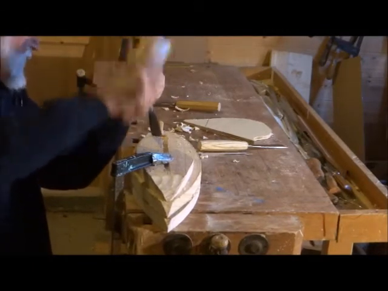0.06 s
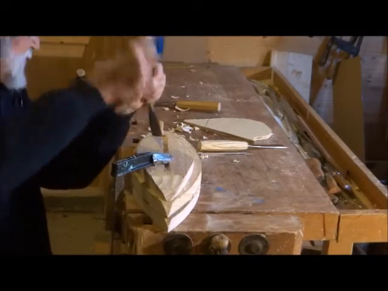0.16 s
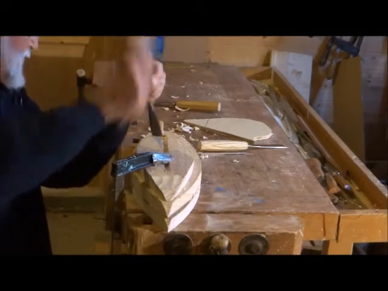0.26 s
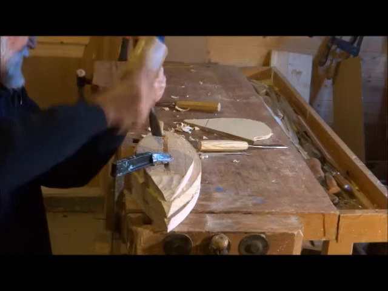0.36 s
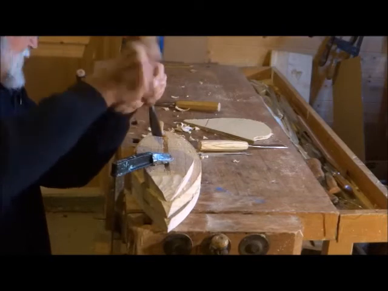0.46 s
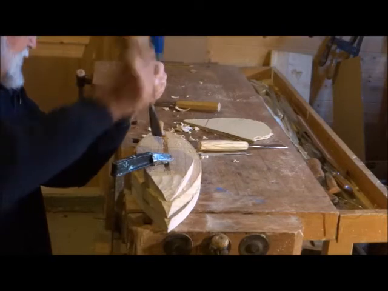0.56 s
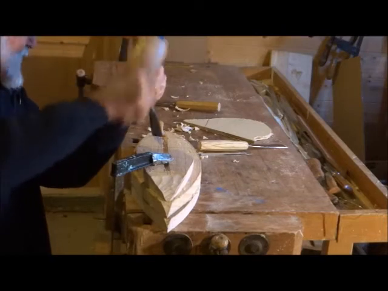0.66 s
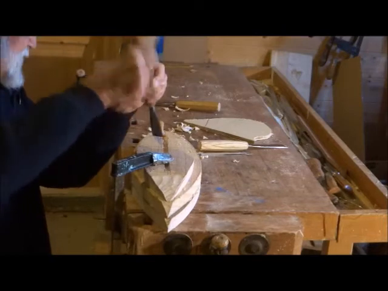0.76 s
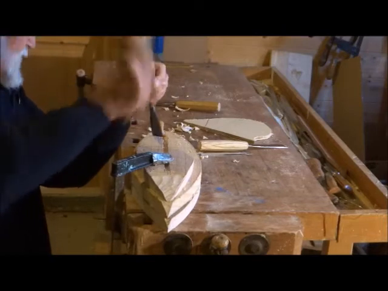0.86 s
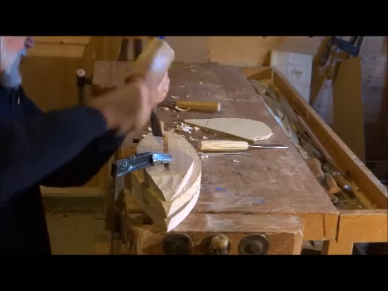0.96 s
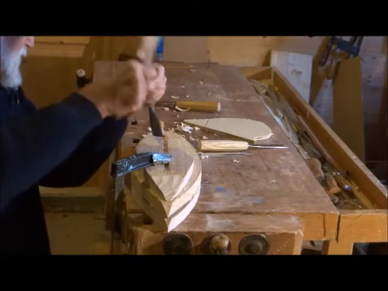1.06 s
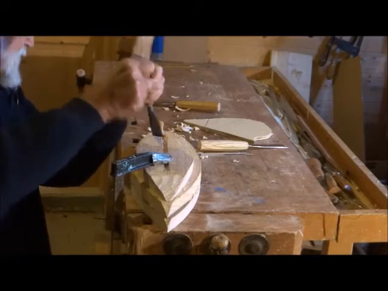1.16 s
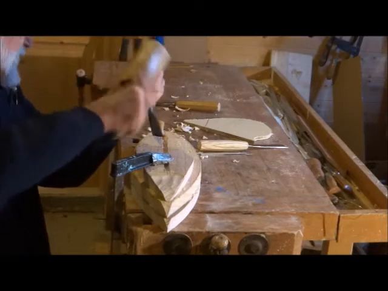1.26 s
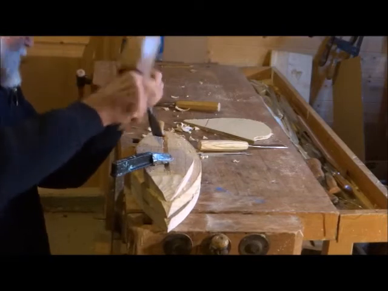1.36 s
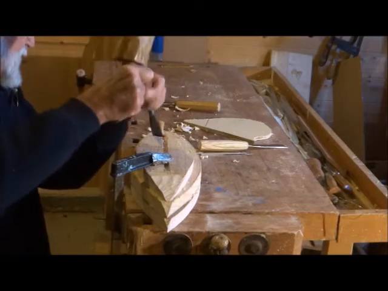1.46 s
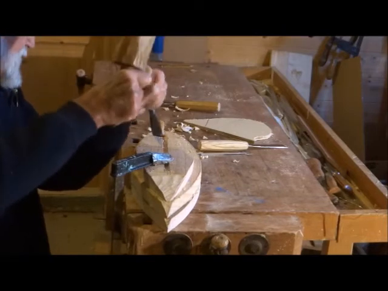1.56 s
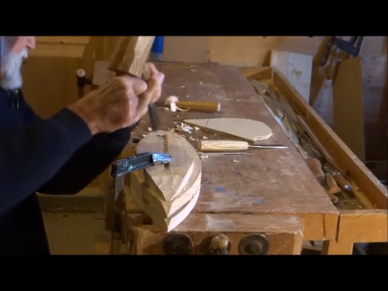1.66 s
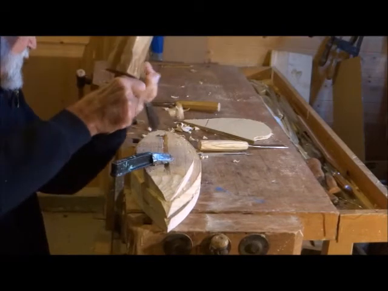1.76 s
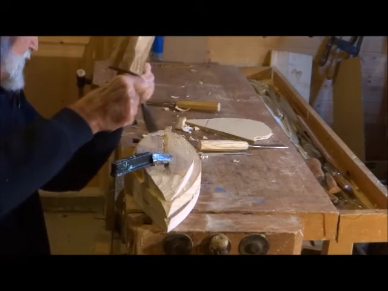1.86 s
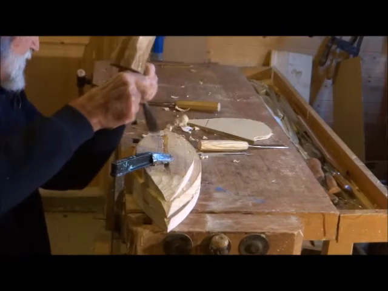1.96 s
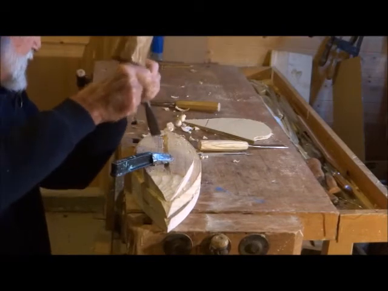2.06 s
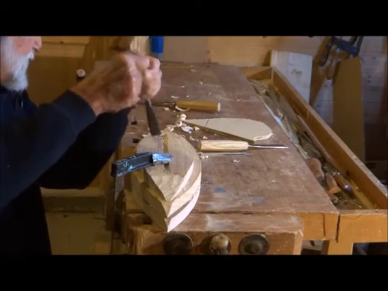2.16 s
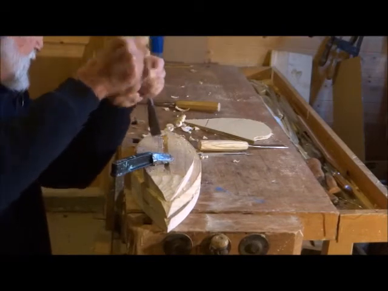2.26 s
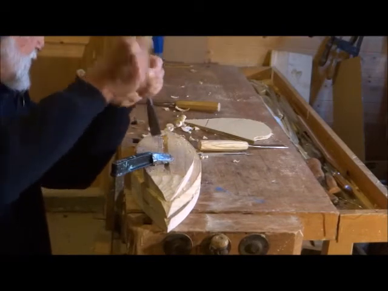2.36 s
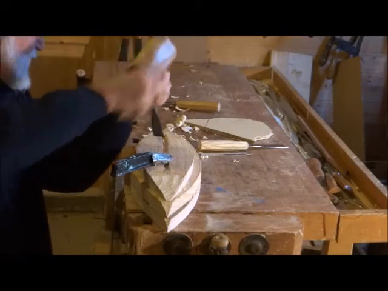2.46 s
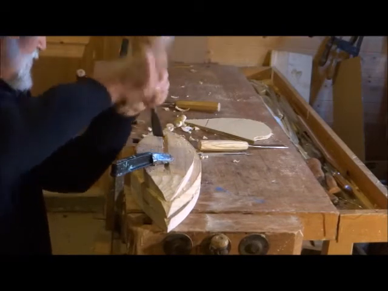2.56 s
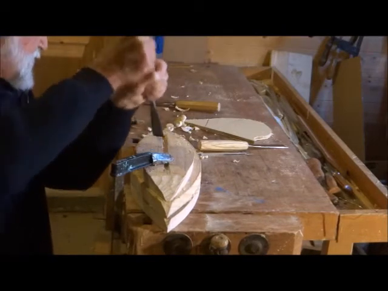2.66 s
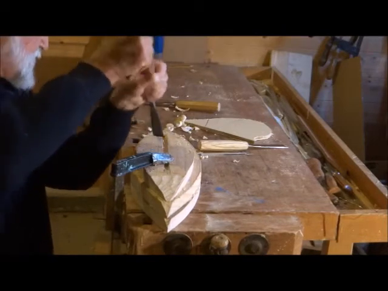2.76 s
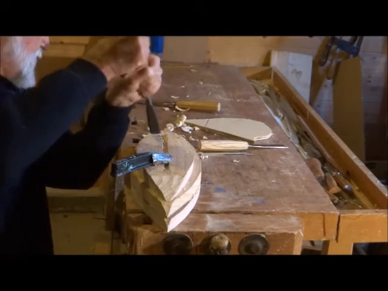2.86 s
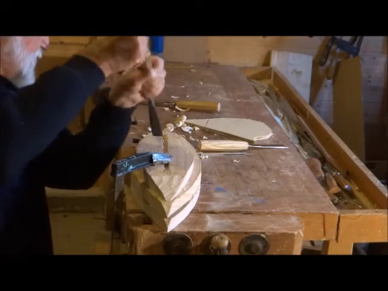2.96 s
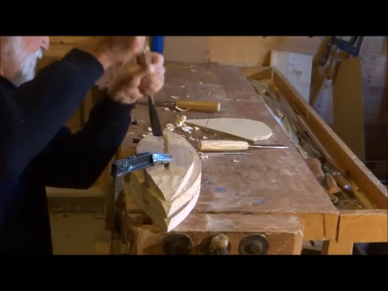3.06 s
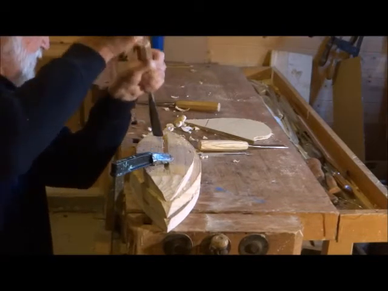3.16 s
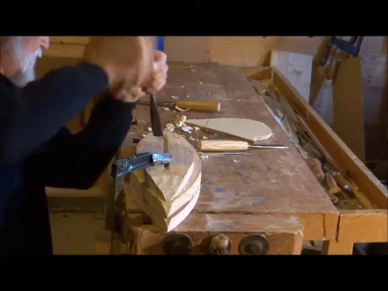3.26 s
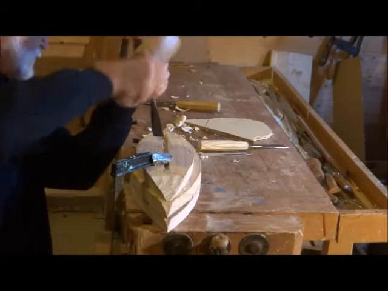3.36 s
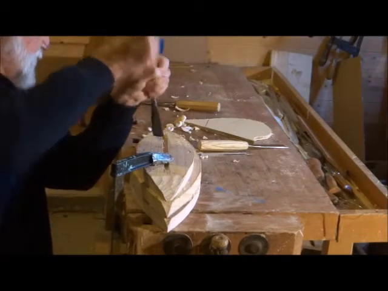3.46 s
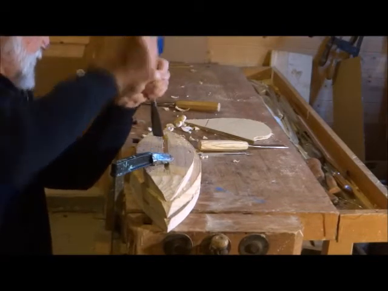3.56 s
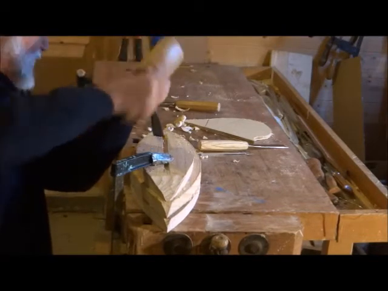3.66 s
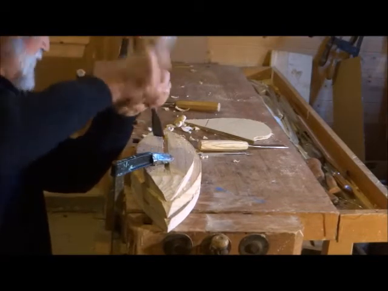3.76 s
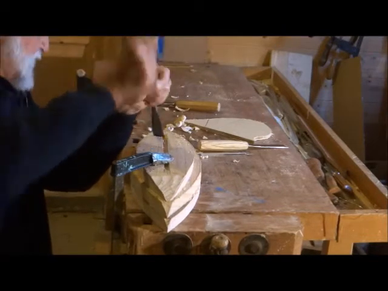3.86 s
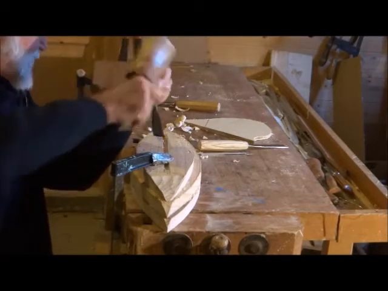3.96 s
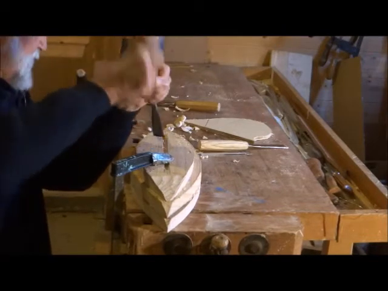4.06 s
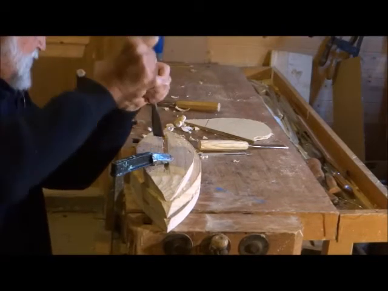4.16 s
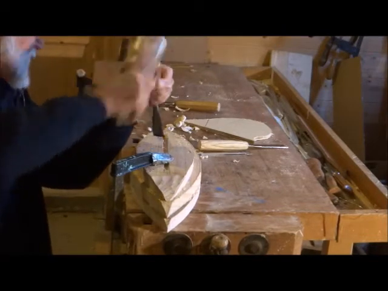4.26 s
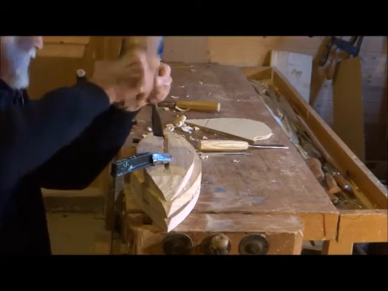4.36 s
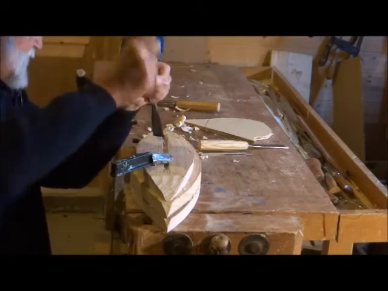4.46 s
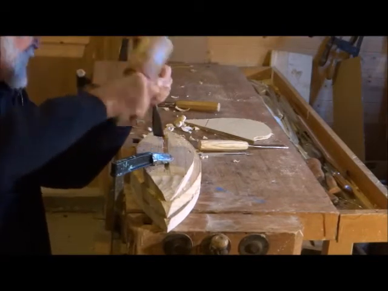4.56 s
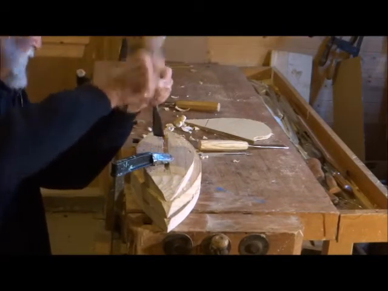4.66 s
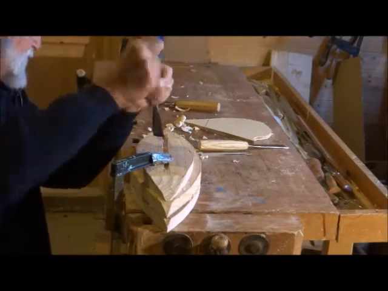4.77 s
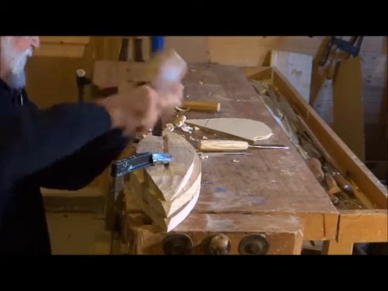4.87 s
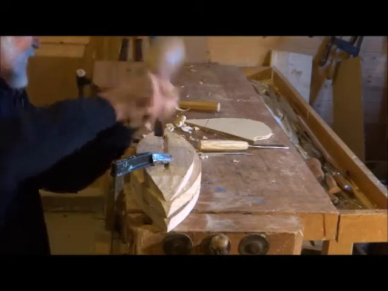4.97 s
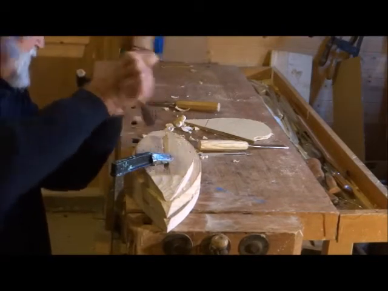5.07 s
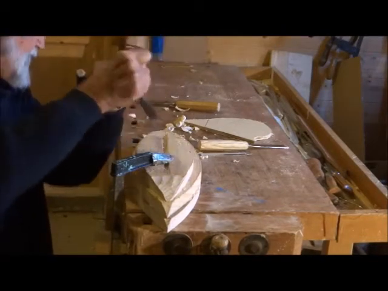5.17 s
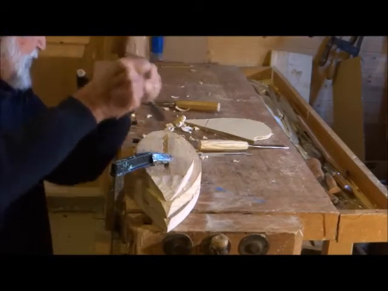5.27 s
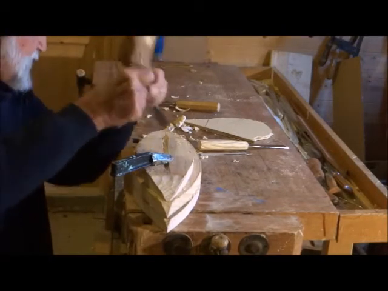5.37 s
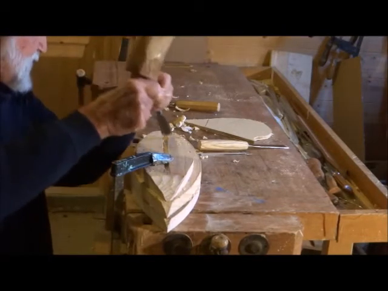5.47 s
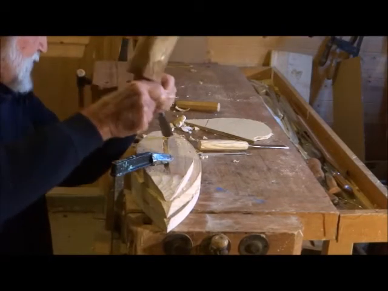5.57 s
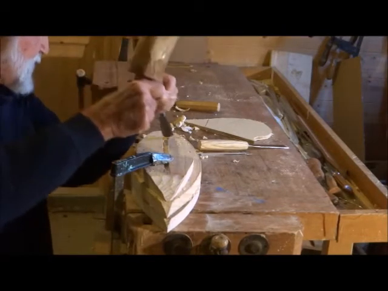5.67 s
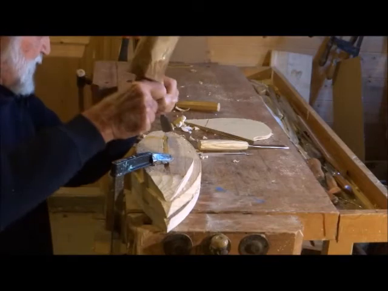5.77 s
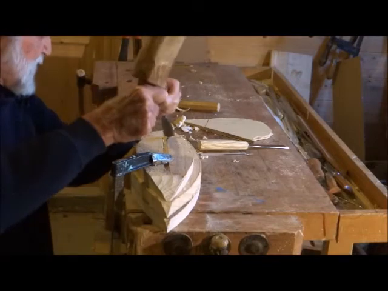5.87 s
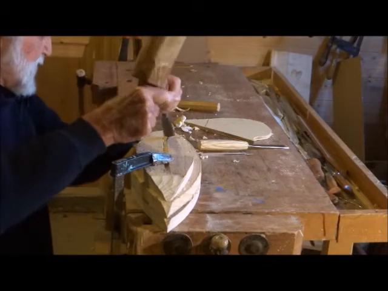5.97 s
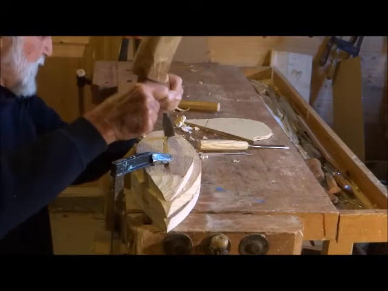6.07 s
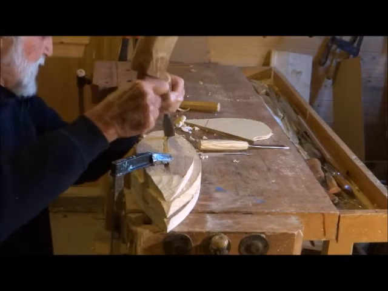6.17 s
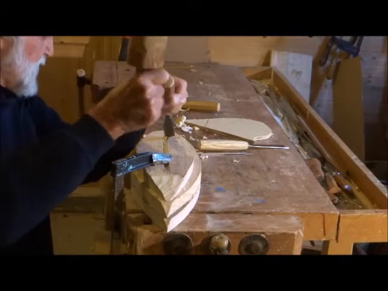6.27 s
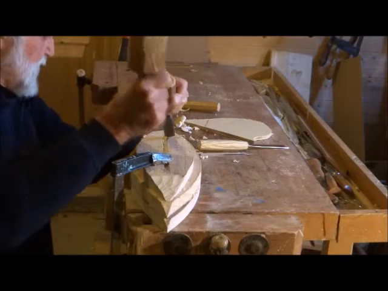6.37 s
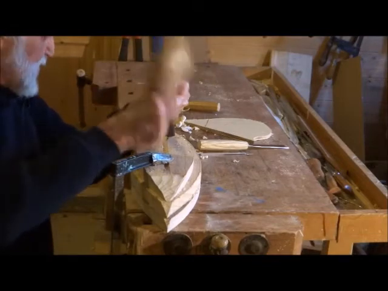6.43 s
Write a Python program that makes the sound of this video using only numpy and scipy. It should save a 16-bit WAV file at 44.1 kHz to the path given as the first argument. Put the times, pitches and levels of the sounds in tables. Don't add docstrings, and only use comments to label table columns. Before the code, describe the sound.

A wooden mallet strikes a chisel in a block clamped to a heavy bench, heard close in a small, short-echoing workshop. Hard knocks land at the very start and at about 0.3, 0.6, 0.9 and 1.2 seconds, each with a sharp woody crack, hollow bench ring and brief steel ring, squashed at its peak. From 1.5 to 2.0 chips snap in dry bright ticks and a duller bump. A softer tap comes at 2.4, then tiny clicks and tearing fibres, with a distinct short scrape near 3.0. A second run follows at 3.3, 3.6, 3.9, 4.2, 4.5 and 4.8, varying slightly in tone, the last strong. Small tearing, scraping ticks follow around 5.0 to 5.1. Quiet shop air then remains, with a dull bench bump at 5.8, faint scrapes near 6.3 and one light tap at 6.45.

```python
import sys
import numpy as np
from scipy import signal
from scipy.fft import rfft, irfft
from scipy.io import wavfile
from scipy.ndimage import uniform_filter1d, minimum_filter1d

SR = 44100
rng = np.random.default_rng(int(sys.argv[2]) if len(sys.argv) > 2 else 0)


def invert_db(level):
    return 10 ** (np.asarray(level, dtype=float) / 20)


def int16_out(signal):
    q = np.round(np.clip(np.atleast_2d(signal).T, -1, 1) * 32767)
    wavfile.write(sys.argv[1], SR, q.astype(np.int16))


N = 286650
LEAD = 2048
FORERUN = 132
HZ = np.fft.rfftfreq(32768, 1 / SR)

# f/Hz, width/Hz, level/dB
BENCH = [(294.4, 8.1, 4), (295.6, 81, -2), (397.2, 6.2, -8), (435.8, 37, 4.5), (493.3, 15, 3.5),
         (604, 170, -2.5), (711, 19, -2.5)]
# f/Hz, width/Hz, level/dB
FLOORBOARDS = [(83, 4.5, -16.5), (116, 7.4, -15.5)]


def blow(force_db, off, bite, edge_hz):
    # f/Hz, level/dB
    push = [(60, -53), (170, -30), (280, -11), (900, 1.04), (2500, -4), (5000, -21.5), (8500, -18.5),
            (11000, -35.5)]
    # f/Hz, width/Hz, level/dB
    mallet = [(1500, 52, -3), (1562.5, 37, -3.5), (1530, 310, -3)]
    handle = [(1151, 83, 6), (1230, 75, -11), (1330, 210, -3)]
    steel = [(1940, 78, 7.5), (2694, 420, 4), (3536, 41, 2.5), (4360, 620, -1.5), (5330, 240, -4),
             (5650, 66, -5.5), (7700, 1100, -16.5)]
    headroom_db = 65
    spread_db = 1.5

    thud_db = -31 + force_db
    body_db = -34.5 + force_db + 11 * bite
    handle_db = -31.5 + 0.89 * force_db - 6.5 * bite
    handle_db += 10 * off
    ring_db = -21 + 0.12 * force_db + 20 * np.log10(np.clip(1 - off, 0.01, 1))
    crack_db = -28 + 0.67 * force_db - 1.5 * bite

    luck = rng.standard_normal(16)
    between_db = 0.5 * (handle_db + crack_db)
    tilt = [(420, thud_db), (750, body_db), (1200, handle_db), (2200, between_db), (4000, crack_db)]
    power = invert_db(read(push, HZ) + read(tilt, HZ)) ** 2
    power += rings(BENCH, thud_db + 5.5, luck, spread_db, 0.0099)
    power += rings(handle, handle_db, luck[9:], spread_db, 0.011)
    power += rings(mallet, ring_db + 1, luck[6:], spread_db, 0.0054)
    power += rings(steel, crack_db - 11, luck[3:], spread_db, 0.0091)
    power += rings(FLOORBOARDS, thud_db - 8.5, luck[2:], spread_db, 0.01)
    edge_db = 6.5 / (1 + (2 * (HZ / edge_hz - 1) / 0.11) ** 2)

    knock = splintered(causal(10 * np.log10(power) + edge_db), 0.004)
    sound = np.r_[np.zeros(FORERUN), knock]
    sound[:len(knock)] += invert_db(-46) * signal.lfilter(*signal.butter(2, 0.1), knock)
    return invert_db(headroom_db) * sound


def rings(modes, db, luck, spread_db, detune):
    hz, width_hz, peak_db = np.transpose(modes)[:, :, None]
    strength = luck[:len(modes), None]
    shift = luck[::-1][:len(modes), None]
    off = 2 * (HZ - hz * (1 + detune * shift)) / width_hz
    skirt = np.minimum(HZ / hz, hz / (HZ + 1)) ** 6
    return (invert_db(db + peak_db + spread_db * strength) ** 2 / (1 + off ** 2) * skirt).sum(0)


def causal(db):
    log_gain = np.log(invert_db(np.maximum(np.r_[db, db[-2:0:-1]], -100)))
    return np.fft.ifft(np.exp(np.conj(signal.hilbert(log_gain)))).real


def splintered(x, lag_s):
    steps_hz = np.arange(0, SR / 2, 700)
    uneven = np.interp(HZ, steps_hz, 0.33 + 0.7 * rng.random(len(steps_hz)))
    treble = np.clip(HZ / 3000 - 0.6, 0, 1)
    lag = lag_s * uniform_filter1d(uneven, size=400) * treble
    late = irfft(rfft(x) * np.exp(-2j * np.pi * np.cumsum(lag) * HZ[1]))
    return late[:24000] * np.hanning(48000)[24000:]


def tear(length_s, *colour):
    u = np.arange(4096) / SR / max(length_s, 0.004)
    size = invert_db(2.5 * rng.exponential(1, 4096)) * rng.standard_normal(4096)
    return invert_db(36.5) * tint(size * u ** 0.91 * (u < 1), *colour)


def snap(*colour):
    return invert_db(33) * tint(np.exp(-np.arange(64) / 0.13), *colour)


def tint(x, level_db, heft, ring_hz):
    anchors_hz = [110, 300, 1100, 1500, 3000, 5000, 9000, 11000]
    middle_db = [-12.5, -0.5, 7, 2.5, 0.9, -1.5, 0, -16]
    swing_db = [45.5, 36, 16.5, -6.5, -11, -26, -24.5, -26]
    heavier = heft - 0.5
    colour_db = level_db + np.array(middle_db) + heavier * np.array(swing_db)
    ring_db = 9 / (1 + ((HZ - ring_hz) / (14 + 0.057 * ring_hz)) ** 2)
    bench = rings(BENCH + FLOORBOARDS, level_db + heavier * 42.5, np.zeros(16), 0, 0)
    power = invert_db(read(np.c_[anchors_hz, colour_db], HZ) + ring_db) ** 2 + bench
    pulse = causal(10 * np.log10(power))[:8192] * np.hanning(16384)[8192:]
    return signal.fftconvolve(unit(x), pulse)


def workshop(x):
    # f/Hz, t60/s
    decay = [(100, 0.39), (260, 0.26), (700, 0.28), (1800, 0.25), (5000, 0.25), (10000, 0.23)]
    # t/s, level/dB
    echoes = [(.0058, -13), (.0085, 6), (.0103, 2), (.016, -9.5), (.021, -13), (.026, -3)]
    loft_db, loft_slower = -23, 1.76

    hz, z = pair(420, size=256)
    t = np.arange(z.shape[2]) * 64 / SR
    fade_db = -60 * t / read(decay, hz)[:, None]
    z = z * np.hypot(invert_db(fade_db), invert_db(loft_db + fade_db / loft_slower))
    tail = signal.istft(z, nperseg=256, noverlap=192)[1]
    build_up = np.clip((np.arange(tail.shape[1]) / SR - 0.001) / 0.012, 0, 1)
    tail = invert_db(21.5) * tail / np.linalg.norm(tail[0]) * build_up
    tail[:, 0] += 1
    for k, (s, db) in enumerate(echoes):
        skew = np.array([1, -1]) * (k % 3 - 1)
        tail[[0, 1], round(s * SR) + skew] += (-1) ** k * invert_db(db)
    return signal.fftconvolve(x[None], tail / np.linalg.norm(tail[0]), axes=1)[:, LEAD:LEAD + N]


def hum():
    # t/s, level/dB
    course = [(0, -69), (2.899, -61.5), (5.299, -65), (5.799, -65.5), (6.0, -62), (6.5, -64)]
    # f/Hz, level/dB per Hz
    colour = [(18, -80), (30, -53.5), (170, -20), (400, -17.5), (800, -14.5), (2200, -17), (6000, -24),
              (11000, -25)]
    # f/Hz, width/Hz, level/dB
    resonances = [(163, 14, 10.5), (297.3, 21, 15), (496, 160, 10.5), (1000, 150, 6.5), (1770, 300, 2.5)]
    hz, z = pair(N // 256 + 5, size=1024)
    noise = rng.standard_normal(z.shape[:0:-1]).T
    patches_db = 1.2 * evened(uniform_filter1d(uniform_filter1d(noise, 8, 0), 20, 1))
    colour_db = read(colour, hz)
    for f, width_hz, db in resonances:
        colour_db = colour_db + db / (1 + (2 * (hz - f) / width_hz) ** 2)
    z = z * invert_db(colour_db[:, None] + patches_db)
    air = signal.istft(z, nperseg=1024, noverlap=768)[1][:, :N]
    return evened(air) * invert_db(np.interp(np.arange(N) / SR, *np.transpose(course)))


def pair(frames, size):
    # f/Hz, likeness/0-1
    likeness = [(60, .94), (200, .99), (500, .97), (1000, .92), (2000, .87), (4000, .84), (8000, .79)]
    hz = np.fft.rfftfreq(size, 1 / SR)
    a, b, c, d = rng.standard_normal((frames, len(hz), 4)).T
    same = np.clip(read(likeness, hz), 0, 1)[:, None]
    mid = np.sqrt((1 + same) / 2) * (a + 1j * b)
    side = np.sqrt((1 - same) / 2) * (c + 1j * d)
    return hz, np.array([mid + side, mid - side])


def read(points, hz):
    f, value = np.transpose(points)
    return np.interp(np.log(hz + 1), np.log(f + 1), value)


def evened(x):
    return x / np.sqrt(np.mean(x ** 2) + 1e-20)


def unit(x):
    return x / np.linalg.norm(x)


def add(mix, s, sound):
    part = mix[round(s * SR) + LEAD:][:len(sound)]
    part += sound[:len(part)]


def scene():
    # t/s, force/dB, off face centre/0-1, bite into solid wood/0-1, buried edge f/Hz
    blows = [(-0.012, 1, 0.4, 0.3, 7600), (0.2945, 0, 0.5, 0.2, 7730), (0.5966, -1, 0.2, 0, 7700),
             (0.9065, -1.5, .3, .6, 4180), (1.227, -3, 0.6, 1, 6460), (2.4155, -12, 0.4, 0.6, 5380),
             (3.2954, -1, 0.3, .3, 7700), (3.6153, -0.5, 0.29, .15, 6440), (3.9267, 1, 0.5, 0.6, 6060),
             (4.231, 0, .95, 0.8, 7920), (4.5346, -1.6, .5, .8, 4200), (4.832, 2, 0, 0.2, 3670),
             (6.4495, -14.5, .75, 0.7, 7600)]
    # t/s, level/dB, heft/0-1, ring f/Hz
    snaps = [(1.5493, -56, 0, 3000), (1.5582, -50.5, 0, 3820), (1.567, -59.5, .8, 480),
             (1.818, -53, 0.26, 4140), (1.821, -51, 0.44, 3700), (1.9785, -50, 0.66, 1110),
             (2.603, -51.5, 0.63, 7050), (2.855, -65, 0.6, 1650), (2.928, -54.5, 0.9, 500),
             (5.569, -73, 1, 310), (5.599, -73, 0.99, 310), (5.813, -50.5, 0.88, 306)]
    # t/s, length/s, level/dB, heft/0-1, ring f/Hz
    tears = [(1.699, 0.023, -73.5, 0.13, 7500), (1.918, 0.027, -72, 0.04, 8800),
             (1.99, .04, -58.5, 0.8, 474), (2.332, 0.11, -70, 0.5, 5000), (2.748, 0.016, -69.5, 0.1, 7700),
             (2.917, 0.033, -52.5, 0.48, 7400), (3.003, 0.027, -46.5, 0.5, 2180),
             (3.03, .031, -30.5, 0.29, 2265), (3.882, 0.018, -60.5, 0.4, 7400),
             (4.945, .02, -51.5, 0.3, 7650), (5.082, .02, -58, 0.4, 4450), (5.114, .028, -43.5, 0.6, 3970),
             (6.272, 0.033, -66, 0.3, 4060), (6.389, 0.027, -67, .33, 3820)]
    near_db = -14.5

    small = [(s, snap(*row)) for s, *row in snaps]
    small += [(s, tear(*row)) for s, *row in tears]
    sounds = [(s - FORERUN / SR, blow(*row)) for s, *row in blows] + small
    spots = np.abs(1 + 0.83 * rng.standard_normal((len(sounds), 3)))
    paths, near = np.zeros((3, N + LEAD)), np.zeros(N + LEAD)
    for (s, sound), spot in zip(sounds, spots):
        for path, share in zip(paths, unit(spot)):
            add(path, s, share * sound)
    for s, sound in small:
        add(near, s, sound)
    return sum(workshop(path) for path in paths) + invert_db(near_db) * near[LEAD:] + hum()


def roll_off(x):
    return signal.sosfilt(signal.butter(12, 11200, fs=SR, output="sos"), x)


def record(dry):
    threshold_db, release_db_per_s = -8, 420
    peak_db = 20 * np.log10(-minimum_filter1d(-abs(dry).max(0), size=193) + 1e-9)
    fall_db = np.arange(N) * release_db_per_s / SR
    envelope_db = np.maximum.accumulate(peak_db + fall_db) - fall_db
    over_db = np.maximum(envelope_db - threshold_db, 0)
    held = dry / invert_db(0.86 * uniform_filter1d(over_db, size=97))
    held = signal.sosfilt(signal.butter(2, 120, "highpass", fs=SR, output="sos"), held)
    band_limit = signal.firwin(201, 11000, window=("kaiser", 5.2), fs=SR)
    mix = signal.oaconvolve(held, band_limit[None], "same")
    return roll_off(mix)


dry = scene()
out = record(dry)
int16_out(out)
```